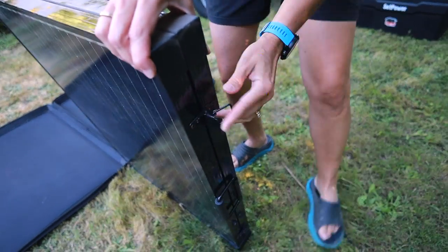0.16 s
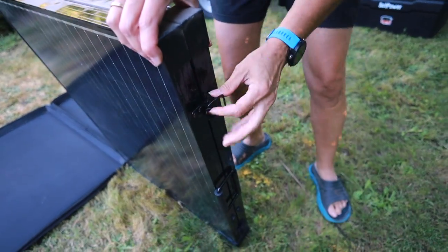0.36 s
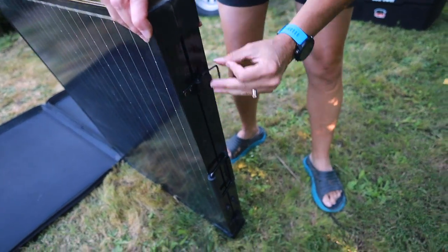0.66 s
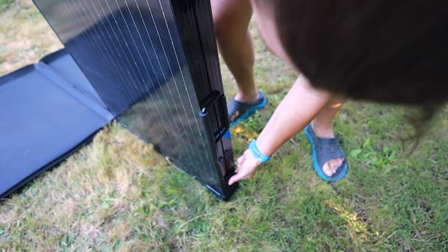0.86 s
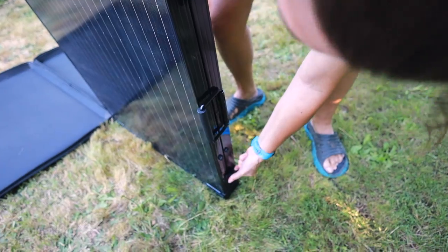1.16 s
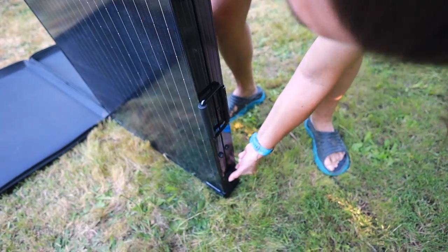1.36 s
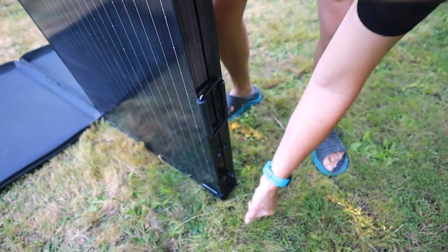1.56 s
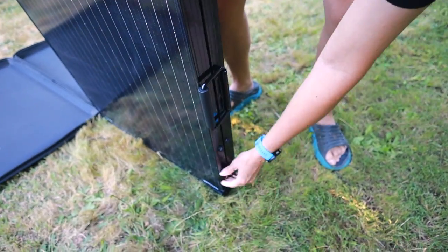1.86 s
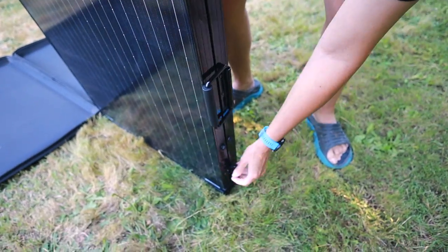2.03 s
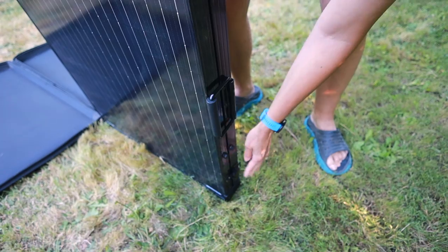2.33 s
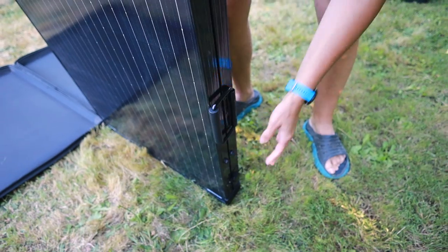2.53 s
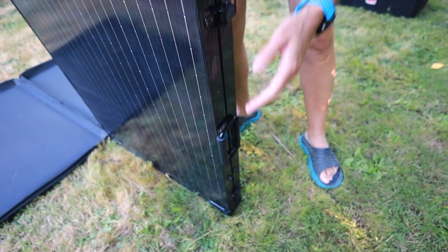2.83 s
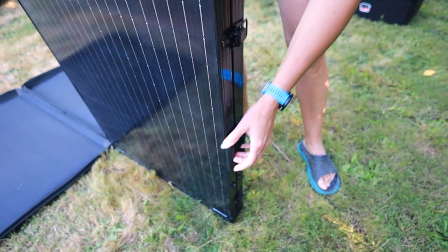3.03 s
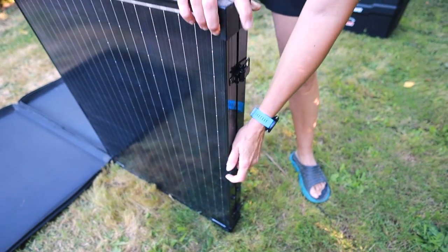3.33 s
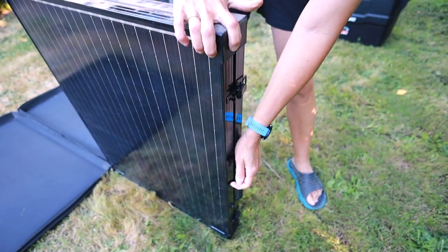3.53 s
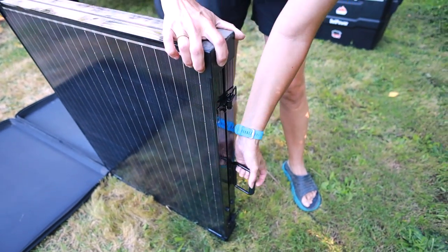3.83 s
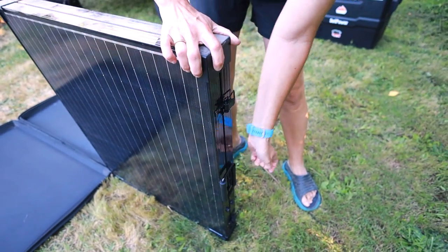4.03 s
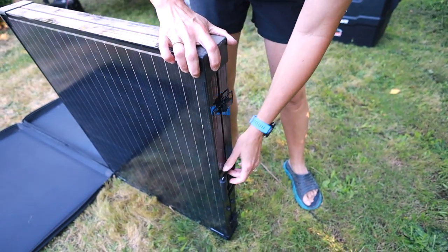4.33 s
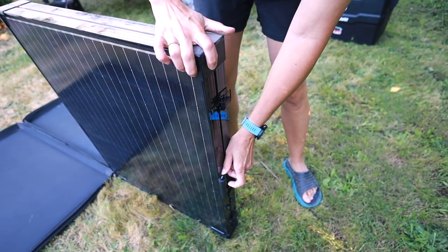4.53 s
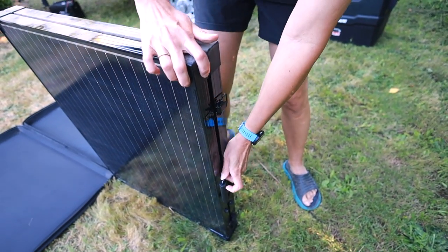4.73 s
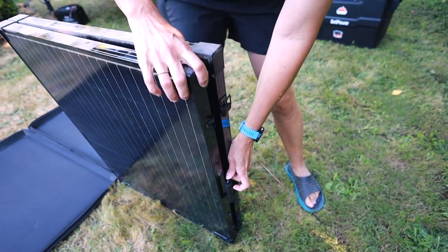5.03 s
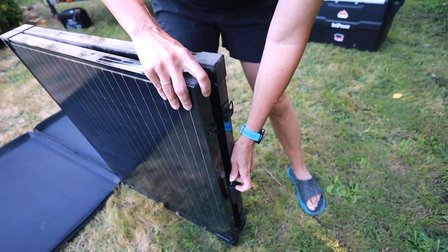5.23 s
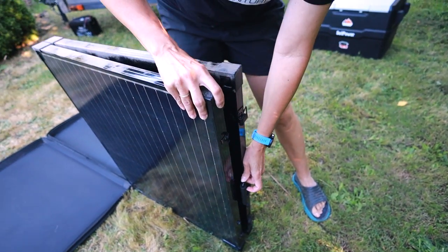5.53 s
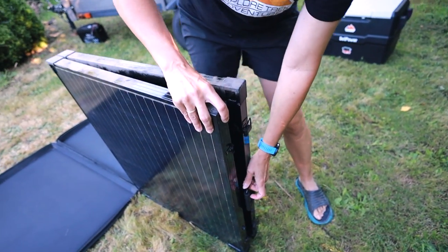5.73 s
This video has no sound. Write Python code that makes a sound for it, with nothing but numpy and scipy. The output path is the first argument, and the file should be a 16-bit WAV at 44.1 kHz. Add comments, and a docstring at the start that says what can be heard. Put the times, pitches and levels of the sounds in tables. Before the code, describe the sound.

Small metal toggle latches click open on a glass and aluminium case on a lawn, one springing with a hard crack amid quiet skin rubs.

```python
"""Outdoors on a lawn, one microphone hears air and, far off, a low wavering hum: noise bands and two tones.
Hands fumble on a folding glass-and-aluminium panel case, as grainy rubbing noise, from the start.
Its metal toggle latches are flicked open: each contact rings frame, panels, latch and wire by their modes,
and things nearby return a wash of noise. From 2.4 s a palm strokes the edge, in swelling noise bands.
At 4.0 s one latch springs open with a loud snap; softer contacts, presses and handling follow to the end."""
import sys
import numpy as np
from scipy import signal
from scipy.io import wavfile
from scipy.ndimage import uniform_filter1d

SR = 44100
rng = np.random.default_rng(int(sys.argv[2]) if len(sys.argv) > 2 else 0)


def pcm_store(signal):
    """Save signal as 16-bit PCM."""
    levels = np.round(np.clip(np.atleast_2d(signal), -1, 1) * 32767)
    wavfile.write(sys.argv[1], SR, levels.astype(np.int16).T)


N = 259484


def from_db(db):
    """Decibels to amplitude gain."""
    return 10 ** (np.asarray(db) / 20)


def rms_one(x):
    """Scale to rms 1."""
    return x / np.sqrt(np.mean(x ** 2) + 1e-20)


def in_time(rows):
    """Interpolate the columns of a table over its times, one value per sample."""
    times_s, *columns = np.transpose(rows)
    return [np.interp(np.arange(N) / SR, times_s, column) for column in columns]


def drift(rate_hz):
    """Slow random wandering of rms 1: noise through two equal low-pass poles at rate_hz."""
    step = 40   # samples between drawn values
    pole = np.exp(-2 * np.pi * rate_hz * step / SR)
    white = rng.standard_normal(N // step + 2002)
    slow = signal.lfilter([1], [1, -2 * pole, pole ** 2], white)[2000:]   # drop the filter's start
    return np.interp(np.arange(N) / step, np.arange(len(slow)), rms_one(slow))


def banded(spectrum, white, patchy_db):
    """Third-octave bands of a noise, each with its own level and flicker; rms 1."""
    hz, level_db = np.transpose(spectrum)
    edges_hz = np.geomspace(20, 17000, 30)
    out = 0
    for k, (low, high) in enumerate(zip(edges_hz, edges_hz[1:])):
        centre = np.sqrt(low * high)
        if hz[0] < centre < hz[-1]:
            band_filter = signal.butter(2, [low, high], "band", fs=SR, output="sos")
            band = signal.sosfilt(band_filter, white[k % 2])   # neighbours use different noise
            band_db = np.interp(np.log(centre), np.log(hz), level_db)
            out = out + band * from_db(band_db + patchy_db * drift(5.5))
    return rms_one(out)


def resonant_noise(hz, width_hz):
    """Noise twice through one resonance; rms 1."""
    pole = np.exp(-np.pi * width_hz / SR)
    zeros = [1, 0, -1]
    poles = [1, -2 * pole * np.cos(2 * np.pi * hz / SR), pole ** 2]
    once = signal.lfilter(zeros, poles, rng.standard_normal(N + SR))
    return rms_one(signal.lfilter(zeros, poles, once)[SR:])   # the first second settles the filter


def air():
    """Outdoor air around the microphone: noise strongest in the bass, flickering band by band."""
    # spectrum of the air: f/Hz, relative level per Hz/dB
    air_spectrum = [(15, -51.5), (25, -21.5), (38, -13.5), (92, -1), (161, -3.5), (591, -7.5), (659, -13.5),
                    (962, -10.5), (2050, -22), (3920, -23), (12200, -38.5), (13600, -57.5), (16000, -55)]
    return from_db(-73.5) * banded(air_spectrum, rng.standard_normal((2, N)), patchy_db=1.36)


def hum():
    """Two far-off low tones that waver in pitch and level, blurred by noise in the same resonances."""
    # level of the hum before the level waver: t/s, lower level/dB, upper level/dB
    hum_levels = [(0.0, -73.5, -77.5), (0.87, -77, -75), (0.95, -85, -77.5), (2.2, -91.5, -77),
                  (2.6, -88.5, -72.5), (3.34, -83, -78), (4.2, -77, -73), (4.8, -79.5, -76.5),
                  (5.88, -93, -75)]
    # the two resonances: f/Hz, width of each filter pass/Hz
    hum_tones = [(65, 22), (96, 20)]
    waver_hz, waver_db = 1.5, 2.0   # rms
    noise_share = .3   # of the amplitude
    out = 0
    for level_db, (hz, width_hz) in zip(in_time(hum_levels), hum_tones):
        phase = 2 * np.pi * np.cumsum(hz + waver_hz * drift(6.9)) / SR
        tone = np.sqrt(2) * np.sin(phase) * from_db(waver_db * drift(18.0))
        noise = resonant_noise(hz, width_hz)
        out = out + from_db(level_db) * (noise_share * noise + np.sqrt(1 - noise_share ** 2) * tone)
    return out


def hands():
    """Skin rubs in grainy noise: dull through the panels, bright off the frame, with a thin hiss."""
    # hands on the case: t/s, dull fumbling level/dB, skin sliding level/dB
    handling = [(0.0, -76, -86), (0.15, -66, -67.5), (0.33, -65, -76), (0.72, -67, -80), (0.9, -81, -110),
                (1.64, -86.5, -89.5), (2.13, -87, -100), (2.29, -58.5, -75), (2.43, -69, -75.5),
                (2.65, -71, -78), (2.93, -79, -84.5), (3.49, -71.5, -78.5), (3.78, -74, -82.5),
                (4.1, -69, -75.5), (4.26, -77, -82.5), (4.46, -68.5, -75.5), (4.99, -64.5, -70.5),
                (5.26, -65.5, -65), (5.44, -53.5, -62.5), (5.55, -67.5, -86), (5.88, -74, -81.5)]
    # spectra of fumbling, sliding and hiss: f/Hz, relative level per Hz/dB
    fumble_spectrum = [(88, -36), (150, -6.5), (346, -0.5), (631, 0), (709, 1), (2070, -14.5), (2500, -19),
                       (3250, -47), (5500, -120)]
    slide_spectrum = [(710, -33.5), (1200, -8), (1740, -2), (2030, 1), (2450, -2.5), (3850, 2),
                      (5210, -10.5), (8000, -16.5), (10400, -49.5), (17600, -120)]
    hiss_spectrum = [(2940, -29.5), (5000, 6), (5270, 0.5), (6660, -0.5), (7670, -7), (9460, 0),
                     (16000, -13)]
    fumble_db, slide_db = in_time(handling)
    hiss_db = -85.5 + .5 * (slide_db + 75)   # hiss follows half the swing of the sliding, in dB
    grain = rng.standard_normal((2, N)) * from_db(1.3 * drift(90.0))
    fumble = from_db(fumble_db) * banded(fumble_spectrum, grain, patchy_db=0.5)
    slide = from_db(slide_db) * banded(slide_spectrum, grain, patchy_db=2.16)
    hiss = from_db(hiss_db) * banded(hiss_spectrum, grain, patchy_db=2.0)
    return fumble + slide + hiss


def struck(modes, times, rises, levels_db, centres_hz, rattles, focus_db, spread_db, chatter, freedom):
    """Each contact is a first blow and a dying chatter of tiny blows, ringing the modes with new strengths."""
    t = np.arange(SR // 4) / SR
    hz, mode_db, t60 = np.transpose(modes)[:, :, None]
    rings = from_db(mode_db - 60 * t / t60) * np.sin(2 * np.pi * hz * t)
    # little sounds outside the span of the modes
    span = signal.butter(3, [hz.min() * 0.81, hz.max() * 1.4], "band", fs=SR, output="sos")
    out = np.zeros(N + len(t))
    for s, rise, level_db, centre, rattle in zip(times, rises, levels_db, centres_hz, rattles):
        gentle = np.clip((-level_db - 16.5) / 35, 0.45, 1.5)   # light touches wake fewer modes
        # the spot struck favours modes near one pitch
        near_db = -focus_db * gentle * np.log2(hz[:, 0] / centre) ** 2
        strengths = from_db(near_db + spread_db * rng.standard_normal(len(modes)))
        strengths *= np.where(rng.random(len(modes)) < .25, -1, 1)   # most modes start together
        swell = np.minimum(t / max(rise, .0002), 1)   # a soft touch builds up, a hard one is sudden
        dying = from_db(-60 * np.maximum(t - rise, 0) / np.clip(rattle, .003, .3))
        blows = chatter * rng.laplace(size=len(t)) * swell * dying
        blows[0] = np.exp(-rise / 0.0069)   # the first blow is weaker in a slow touch
        # a part that is gripped rattles briefly and rings briefly
        held = from_db(-60 * t / (freedom * rattle))
        ringing = signal.fftconvolve(blows, held * (strengths @ rings))[:len(t)]
        sound = signal.sosfilt(span, ringing)
        loudest = np.sqrt(uniform_filter1d(sound ** 2, size=220).max())   # rms over 5 ms
        out[round(s * SR):][:len(t)] += from_db(level_db) * sound / loudest
    return out[:N]


def latches():
    """Frame, panels, latch plate and wire loop answer every contact and press by ringing in their modes."""
    # sharp contacts: t/s, levels of frame knock/dB, panel thud/dB, latch click/dB, wire tick/dB,
    # knock f/Hz, click f/Hz, rattle t60/s (before the latch spring acts)
    contacts = [(0.088, -52, -69, -64.5, -75, 960, 3370, 0.17),
                (0.105, -47, -93, -49.5, -63, 970, 3100, 0.17),
                (0.244, -41, -79, -46.5, -59.5, 900, 2740, 0.17),
                (0.276, -71, -74, -58, -67, 1060, 3520, 0.047),
                (0.285, -36.5, -53, -40.5, -53.5, 1040, 4030, 0.12),
                (0.417, -53, -75, -59.5, -94, 970, 2920, 0.11),
                (0.452, -56, -76, -61, -85, 840, 2760, 0.12),
                (0.467, -48, -63.5, -53.5, -65, 800, 3060, 0.13),
                (0.739, -43, -91, -39, -52.5, 890, 3020, .11),
                (0.919, -68, -93, -62.5, -65, 760, 3440, 0.045),
                (1.4294, -25.5, -54, -36, -44.5, 1120, 4130, 0.016),
                (1.435, -31, -38.5, -62, -50.5, 1020, 3700, 0.077),
                (1.442, -43, -43.5, -49, -75, 1050, 3070, 0.13),
                (1.467, -74, -69, -49.5, -60, 790, 3900, 0.011),
                (1.473, -47, -48.5, -48.5, -59, 860, 4700, 0.11),
                (1.862, -77, -86, -66, -70, 760, 4280, 0.053),
                (1.9294, -38.5, -58, -39, -50.5, 980, 3760, 0.1),
                (1.984, -51.5, -66, -85, -90.5, 720, 3480, 0.1),
                (2.143, -47, -64, -42, -50.5, 940, 3450, 0.081),
                (2.177, -43.5, -57, -38, -53.5, 1070, 2870, 0.066),
                (2.194, -45, -73.5, -46.5, -62, 1050, 3000, 0.075),
                (2.213, -46.5, -66.5, -48, -63, 1120, 3120, 0.061),
                (2.2236, -34, -65.5, -27.5, -40, 1140, 3420, 0.064),
                (2.238, -39.5, -52, -25.5, -27.5, 1250, 3870, 0.035),
                (2.247, -36, -60.5, -31.5, -31.5, 1030, 4160, 0.083),
                (2.335, -47, -65, -59.5, -73, 820, 2940, 0.12),
                (2.371, -56, -76, -55.5, -61, 890, 3900, 0.059),
                (2.401, -49, -59.5, -44.5, -59.5, 910, 3030, 0.09),
                (2.869, -79.5, -68, -67.5, -97, 1020, 3530, 0.046),
                (3.125, -62, -65.5, -64, -75, 810, 3330, 0.07),
                (3.229, -77, -94, -71.5, -88, 880, 3230, 0.047),
                (3.262, -83, -84, -67, -74, 830, 3700, 0.011),
                (3.428, -59, -66.5, -66, -76, 760, 3300, 0.21),
                (3.648, -55, -64.5, -69.5, -87, 720, 2430, 0.15),
                (3.816, -51.5, -56, -83, -90, 690, 3330, 0.12),
                (3.989, -35.5, -38, -38.5, -65, 1120, 2780, 0.11),
                (3.995, -27, -39, -38.5, -47.5, 1010, 3670, 0.02),
                (3.999, -28, -39.5, -23, -37, 890, 3780, 0.052),
                (4.007, -15.5, -32, -11.5, -24.5, 1120, 3040, .12),
                (4.013, -14, -28.5, -24, -39.5, 600, 3520, 0.047),
                (4.021, -24, -45.5, -23.5, -46, 900, 2600, 0.051),
                (4.048, -23.5, -47.5, -20, -31.5, 1210, 4094, 0.11),
                (4.052, -26.5, -41, -36, -49, 750, 3480, .075),
                (4.068, -28.5, -39.5, -31, -40.5, 830, 3500, 0.054),
                (4.073, -40, -48.5, -33, -54, 760, 3730, 0.16),
                (4.094, -40, -65, -56, -51, 790, 3700, 0.052),
                (4.128, -52, -61, -56.5, -61.5, 640, 3610, 0.14),
                (4.265, -95, -79, -87.5, -67.5, 840, 3350, 0.02),
                (4.403, -64, -61, -67.5, -68, 740, 3180, 0.031),
                (4.425, -48, -53.5, -60.5, -73, 650, 3340, 0.029),
                (4.436, -49, -54, -70, -85.5, 650, 3180, 0.063),
                (4.828, -50, -59.5, -81.5, -90.5, 860, 3020, 0.0091),
                (4.942, -55, -63, -63.5, -86, 780, 2190, .008),
                (5.122, -63, -80, -53.5, -73, 850, 3370, 0.011),
                (5.155, -69, -93.5, -64, -63.5, 860, 2700, 0.074),
                (5.394, -45, -75, -77, -78.5, 830, 2280, 0.029),
                (5.427, -59, -77, -51, -78, 960, 1860, 0.074),
                (5.457, -46.5, -57, -59, -78, 910, 2780, 0.053),
                (5.469, -48, -60, -51, -84, 830, 2545, 0.072),
                (5.486, -50.5, -53.5, -60, -67.5, 730, 2850, 0.067),
                (5.591, -60, -63, -60.5, -67, 760, 3095, 0.09),
                (5.616, -56, -62.5, -55, -73, 850, 2800, .14),
                (5.689, -80, -76.5, -71, -80, 720, 2940, 0.025),
                (5.73, -71, -76.5, -69.5, -88, 1200, 2007, 0.043),
                (5.77, -67, -80, -71, -90, 1200, 2200, .04),
                (5.838, -71.5, -76, -68.5, -78.5, 1300, 2200, .022)]
    # soft presses that build up: the same columns, then rise/s
    presses = [(0.216, -53, -60, -63.5, -72, 1020, 3900, 0.11, 0.0062),
               (0.527, -53.5, -84, -65, -71, 950, 3100, 0.16, .0054),
               (0.598, -55.5, -67, -76, -75, 900, 2800, 0.087, 0.0084),
               (0.699, -53, -75, -60.5, -65.5, 900, 3100, 0.12, 0.0037),
               (1.135, -62, -72, -79, -85, 750, 3330, 0.093, 0.005),
               (1.894, -57.5, -73, -80, -85, 800, 3400, 0.15, 0.0072),
               (1.911, -72, -78, -67, -70, 800, 4500, 0.047, .008),
               (2.113, -58.5, -76, -82, -99, 900, 3370, 0.15, 0.0038),
               (2.313, -68, -78, -80, -77, 850, 3720, 0.045, 0.0028),
               (3.185, -65.5, -82, -90, -88, 600, 1910, 0.053, 0.0065),
               (3.145, -65, -85, -71, -88, 950, 1880, .12, 0.012),
               (3.285, -83, -85, -71, -81, 900, 3270, 0.14, 0.011),
               (3.362, -85, -89, -63.5, -73, 820, 3330, 0.097, 0.0033),
               (3.598, -62, -64, -69, -85, 710, 2390, 0.16, 0.0041),
               (3.945, -68, -77, -68.5, -78, 700, 3920, 0.074, 0.017),
               (3.971, -44.5, -48.5, -42.5, -60, 1050, 3140, 0.045, .0056),
               (4.464, -63, -62, -87, -90, 553, 3000, .08, 0.0091),
               (4.661, -76.5, -61, -78, -74, 710, 3075, .08, 0.023),
               (4.88, -63, -75.5, -59.5, -74.5, 800, 2280, 0.12, 0.04),
               (5.042, -67, -78, -58.5, -65, 890, 3793, 0.14, 0.02),
               (5.235, -56.5, -62.5, -70, -75, 890, 3050, 0.09, 0.0082),
               (5.36, -60, -50, -77, -72, 680, 3090, 0.06, .0085)]
    # modes of each part: f/Hz, relative level/dB, t60 before the grip shortens it/s
    frame_modes = [(525, -8, 0.01), (590, -5, 0.0043), (628, -5.5, 0.1), (600.4, 4, 0.042),
                   (719, -0.5, 0.091), (864, -5, 0.03), (980, -6.5, 0.053), (894, -6, 0.067),
                   (1010, -7, 0.06), (1086, -3, 0.021), (1146, -8, 0.069), (1150, 0.5, 0.03),
                   (1327.6, -2, 0.032), (1308, -1, 0.039), (1540, -7.5, 0.04)]
    panel_modes = [(180, -12, 0.037), (214, 3.5, 0.1), (265, -7.5, 0.13), (299, -9.5, 0.07), (334, 3, 0.15),
                   (414, -4, 0.077), (474.8, -5.5, 0.03)]
    latch_modes = [(1870, -4, .014), (2105, -5, .013), (2400, -6, .012), (2640, -6, .011), (2840, -4, .011),
                   (3110, -2, .012), (3340, -4, .011), (3570, -2, .012), (3930, 0, .012), (4150, -2, .01),
                   (4360, -3, .01), (4840, -3, .009), (5090, -5, .008), (5560, -4, .007)]
    wire_modes = [(6140, 5, 0.0019), (6880, -4, 0.0032), (7900, -2, 0.002), (9200, -5, 0.001),
                  (8890, -6, 0.0027), (9620, -5, 0.0016), (11340, -5, 0.0015), (13000, -14, 0.006),
                  (13500, -19.5, 0.0022), (14900, -16, .0025)]

    sharp_rise_s, stop_t60_s = 0.0018, .09
    # the latch spring cuts the click and tick rattle of a sharp contact short
    sharp = [(*row, sharp_rise_s, 1 / (1 / row[-1] + 1 / stop_t60_s)) for row in contacts]
    soft = [(*row, row[-2]) for row in presses]
    columns = np.transpose(sharp + soft)
    s, frame_db, panel_db, latch_db, wire_db, knock_hz, click_hz, knock_t60, rise, click_t60 = columns
    # the tick climbs as the wire comes within 21.5 dB of the frame or outweighs it
    tick_hz = 7800 * 2 ** (.006 * np.maximum(wire_db - frame_db + 21.5, 0))
    knocks = struck(frame_modes, s, rise, frame_db, knock_hz, knock_t60,
                    focus_db=37.0, spread_db=4.0, chatter=0.055, freedom=2.1)
    thuds = struck(panel_modes, s, rise, panel_db, knock_hz, knock_t60,
                   focus_db=1.7, spread_db=1.5, chatter=0.054, freedom=6.4)
    clicks = struck(latch_modes, s, rise, latch_db, click_hz, click_t60,
                    focus_db=18.5, spread_db=3.0, chatter=0.18, freedom=0.67)
    ticks = struck(wire_modes, s, rise, wire_db, tick_hz, click_t60,
                   focus_db=9.5, spread_db=3.0, chatter=0.18, freedom=2.5)
    return knocks + thuds + clicks + ticks


def yard(hits):
    """Scattered echoes off things nearby, too many to keep a pitch: noise follows the delayed, dying energy."""
    echo_db, t60_s, delay_s = -28.5, .33, 0.018
    bright = signal.sosfilt(signal.butter(2, 1500, "high", fs=SR, output="sos"), hits)
    decay = from_db(-120 / (t60_s * SR))   # of energy, per sample
    delayed = np.roll(bright, round(delay_s * SR))
    energy = signal.lfilter([1 - decay], [1, -decay], delayed ** 2)
    wash_filter = signal.butter(2, [900, 7000], "band", fs=SR, output="sos")
    wash = signal.sosfilt(wash_filter, rng.standard_normal(N))
    return from_db(echo_db) * np.sqrt(energy) * rms_one(wash)


def palm():
    """Strokes of a palm along the edge: each band of rubbing noise swells unevenly, sinks and lets go."""
    # strokes: start t/s, loudest t/s, end t/s, level at the loudest before flicker/dB,
    # f/Hz, width of each filter pass/Hz
    strokes = [(2.43, 2.5, 2.66, -78.5, 5200, 2200), (3.36, 3.44, 3.51, -74, 9000, 6000),
               (3.365, 3.453, 3.54, -65, 3650, 1400), (3.41, 3.503, 3.66, -66.5, 1990, 600),
               (4.551, 4.7, 5.3, -77, 4900, 1500), (5.078, 5.33, 5.46, -69, 3550, 1300)]
    t = np.arange(N) / SR
    edge = from_db(-6.5)   # start and end of a stroke against its loudest
    out = 0
    for start, loudest, end, level_db, hz, width_hz in strokes:
        stroke = np.interp(t, [start - .02, start, loudest, end, end + 0.014], [0, edge, 1, edge, 0])
        uneven = from_db(level_db + 1.3 * drift(25.0))
        out = out + uneven * stroke * resonant_noise(hz, width_hz)
    return out


def scene():
    """All sources at one microphone."""
    hits = latches()
    return (air() + hum() + hands() + hits + yard(hits) + palm())[None]


def record(dry):
    """The microphone rounds the peaks, thins the deep bass and cuts the top."""
    low_hz, top_hz = 63.6, 16400
    rounded = 1.275 * np.tanh(dry / 1.179)
    thinned = signal.sosfilt(signal.butter(2, low_hz, "high", fs=SR, output="sos"), rounded)
    return signal.sosfilt(signal.cheby2(14, 60, top_hz, fs=SR, output="sos"), thinned)


dry = scene()
out = record(dry)
pcm_store(out)
```